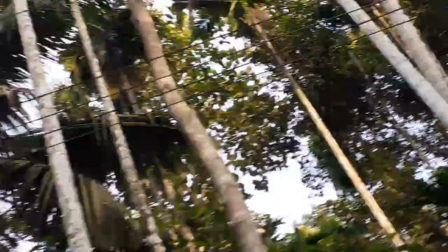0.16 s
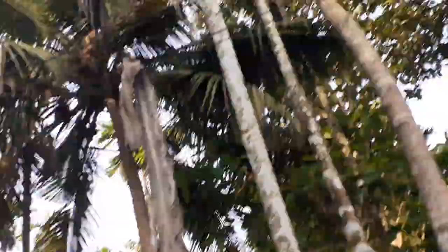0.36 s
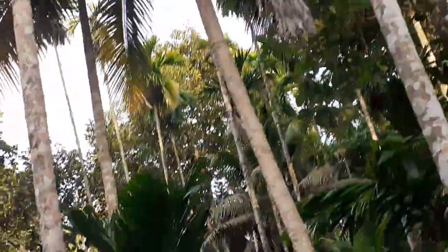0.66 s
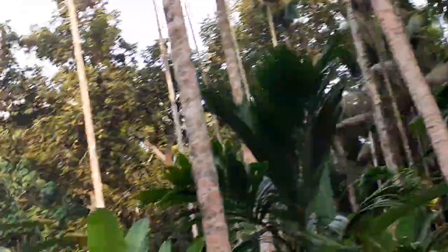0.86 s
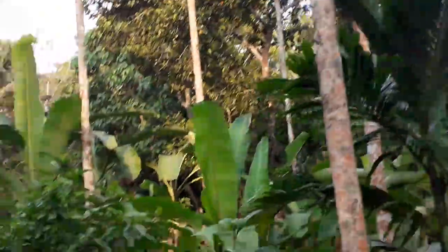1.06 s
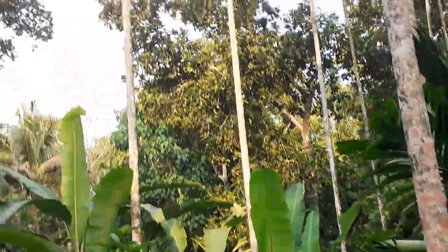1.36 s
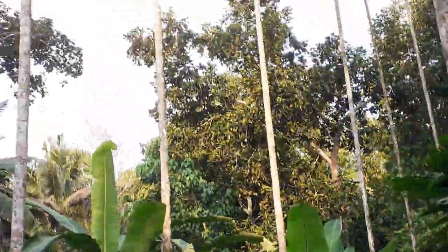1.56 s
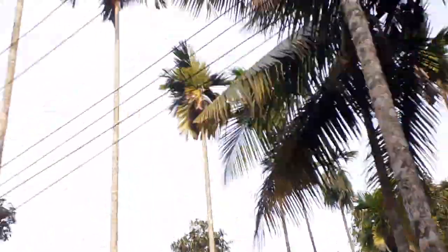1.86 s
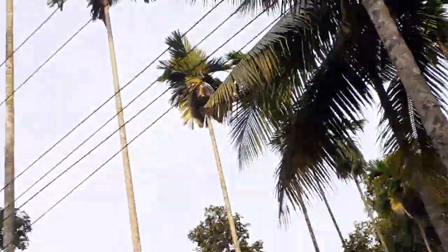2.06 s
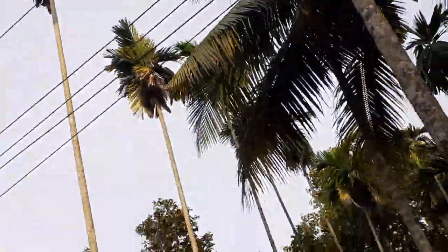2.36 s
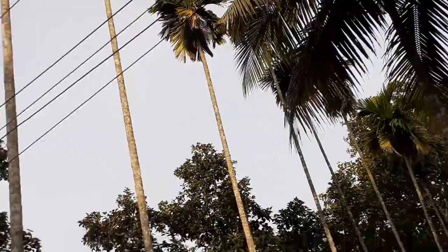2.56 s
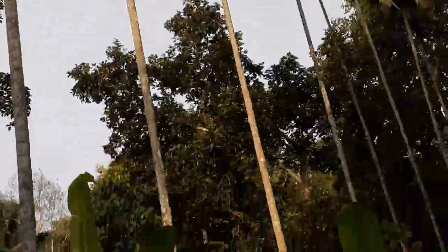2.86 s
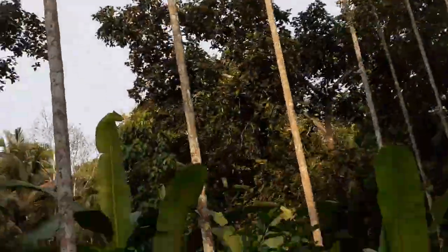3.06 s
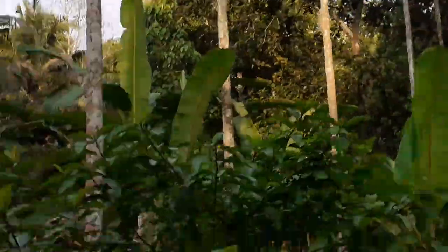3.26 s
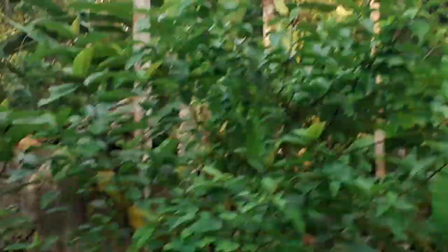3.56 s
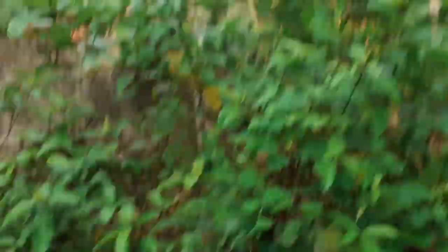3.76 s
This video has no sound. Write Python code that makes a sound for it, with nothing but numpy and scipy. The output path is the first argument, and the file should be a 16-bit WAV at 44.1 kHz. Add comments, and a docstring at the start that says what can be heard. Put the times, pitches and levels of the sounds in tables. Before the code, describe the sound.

A high, unbroken cicada chorus fills a wooded grove outdoors. Soft, slow steps crunch dry leaves and crack twigs near the carried microphone, as far-off birds give drawn-out calls and, later, quick falling chirps.

```python
"""Cicadas shrill without pause in a palm grove, each pulsing at its own rate, its body ringing near 9 kHz.
Other insects buzz further off; distant birds give drawn-out calls and falling chirps among the trees.
Close to the microphone someone walks slowly over leaf litter: crunches, snapping twigs, brushed leaves
and two dull knocks. Under it all lie still air, a soft rustle and the rumble of the carried microphone."""
import sys
import numpy as np
from scipy import signal
from scipy.fft import rfft, irfft, next_fast_len
from scipy.io import wavfile
from scipy.ndimage import map_coordinates

SR = 44100
rng = np.random.default_rng(int(sys.argv[2]) if len(sys.argv) > 2 else 0)


def int16_out(signal):
    """Quantize to a 16-bit WAV file."""
    q = np.round(np.clip(np.atleast_2d(signal).T, -1, 1) * 32767)
    wavfile.write(sys.argv[1], SR, q.astype(np.int16))


N = 171990

# loudness of the chorus in the grove: t/s, level/dB
CHORUS_LEVEL = [(0, -40), (.2, -38), (.45, -40), (.8, -39), (1.35, -41), (1.6, -40), (2.0, -41.5),
                (2.28, -41.5), (2.38, -40), (2.53, -43), (2.78, -39), (2.95, -42.5), (3.4, -41), (3.9, -42)]
# partials of one cicada: multiple of the pulse rate, relative level/dB
CICADA_PARTIALS = [(1, -16), (2, -23.5), (3, -34.5), (4, 1.5), (5, -27), (6, -26.5)]
def cicadas(singers=7, pulse_hz=2241):
    """Each cicada in the grove pulses at its own unsteady rate; its body rings at the fourth partial."""
    spread, drift, flutter = .006, .009, .016  # shares of the pulse rate
    chorus = np.zeros(N)
    for detune in np.linspace(-spread, spread, singers):
        angle = phase(pulse_hz * (1 + detune + drift * wobble(25) + flutter * wobble(700)))
        song = sum(amp(db) * np.sin(k * angle) for k, db in CICADA_PARTIALS)
        chorus += amp(1.13 * wobble(40)) * song
    return grove(unit(chorus) * level(CHORUS_LEVEL), echo=.65) * amp(.64 * wobble(21.93))


# steady drone of far insects: f/Hz, width/Hz, level/dB
DRONE_BANDS = [(2276, 56, -61), (2233, 160, -59), (4583, 284, -57), (6690, 470, -65), (8840, 402, -50.5),
               (8070, 134, -63)]
# a mid-pitched buzzer that rests and resumes: t/s, level/dB
BUZZ_LEVEL = [(0, -67.5), (.15, -61.5), (.31, -58.5), (.55, -55.5), (.85, -58.5), (1.05, -63.5), (1.3, -80),
              (1.7, -100), (3.4, -80), (3.52, -62), (3.65, -60), (3.9, -57)]
# its spectrum: f/Hz, relative level/dB
BUZZ_SPECTRUM = [(1200, -42), (1900, -16), (2600, -0.5), (3100, 4), (3600, -4), (4300, -4.5), (5500, -23),
                 (7000, -41)]
# its weak tones: f/Hz, width/Hz, level against the buzz/dB
BUZZ_TONES = [(3030, 25, -8), (3463, 12, -15.5), (1728, 20, -14.5)]
# spells of high buzzing: t/s, length/s, f/Hz, width/Hz, level/dB
HIGH_SPELLS = [(0.058, 0.39, 9950, 160, -57.5), (1.33, 0.29, 9840, 150, -59), (-0.58, 2.6, 8030, 56, -61.5)]
def far_insects():
    """Further off, many insects merge into bands of noise, some steady, some coming and going."""
    drone = sum(amp(db) * band(hz, width) for hz, width, db in DRONE_BANDS)
    buzz = coloured(BUZZ_SPECTRUM, spiky_db=1.5)
    buzz += sum(amp(db) * band(hz, width) for hz, width, db in BUZZ_TONES)
    return drone + swells(HIGH_SPELLS) + level(BUZZ_LEVEL) * buzz


# drawn-out bird calls: t/s, length/s, f/Hz, level/dB
BIRD_CALLS = [(0.035, 0.28, 1179, -53.5), (0.466, 0.47, 910, -53.5), (0.667, 0.23, 1219, -45),
              (1.5, .35, 960, -55), (1.93, .2, 1180, -44.5), (2.103, 0.21, 1223, -51),
              (2.785, 0.14, 1106, -56.5), (3.12, 0.309, 1216, -48)]
# falling chirps: t/s, starting f/Hz, level/dB
BIRD_CHIRPS = [(1.43, 2380, -44), (2.065, 2500, -41), (2.083, 2000, -47), (2.211, 2450, -39),
               (2.829, 1763, -48.5), (2.882, 2480, -34.5), (2.9, 2060, -40.5), (3.235, 2313, -45.5),
               (3.419, 1776, -44), (3.479, 2400, -37)]
def birds(chirp_s=.024):
    """Distant birds give hoarse arching calls and quick falling chirps, blurred by the trees."""
    call_rise, call_arch, chirp_fall = .04, .045, .2305  # shares of the pitch
    calls, chirps = np.zeros(N), np.zeros(N)
    for start, length, hz, db in BIRD_CALLS:
        u = progress(start, length)
        swell = arch(u)
        bend = call_rise * (u - .5) + call_arch * (swell - np.pi / 4)
        hoarseness = .048 * wobble(300)
        angle = phase(hz * (1 + bend + hoarseness))
        calls += amp(db) * swell * (np.sin(angle) + amp(-21) * np.sin(2 * angle))
    for start, hz, db in BIRD_CHIRPS:
        u = progress(start, chirp_s)
        pitch = hz * (1 - chirp_fall * u + .045 * wobble(600))
        chirps += amp(db) * arch(u) * np.sin(phase(pitch))
    return grove(calls, echo=.73) + grove(chirps, echo=.42)


# steps in leaf litter: t/s, length/s, crunch level/dB, crackle level/dB
FOOTFALLS = [(0.172, .12, -52.5, -53), (0.714, .13, -51.5, -60), (1.273, .14, -50.5, -54),
             (1.85, 0.16, -52, -62), (2.38, 0.088, -50, -48), (2.955, 0.12, -53.5, -62),
             (3.472, 0.11, -45.5, -46.5)]
# spectra of the crunch and the crackle: f/Hz, relative level/dB
CRUNCH_SPECTRUM = [(100, -36), (400, -7.5), (900, 3), (1500, 1.5), (2300, 2), (3500, -19.5), (8000, -12)]
CRACKLE_SPECTRUM = [(800, -11), (2500, 3.5), (5000, 3), (7500, 1), (11000, -6.5), (15500, -15)]
def footsteps(fade_db=6):
    """Each close step presses the litter quickly and lets it settle: a low crunch under a dry crackle."""
    crunch, crackle = np.zeros(N), np.zeros(N)
    for start, length, crunch_db, crackle_db in FOOTFALLS:
        u = progress(start, length)
        crunch += amp(crunch_db) * arch(u ** .61)
        crackle += amp(crackle_db - fade_db * u) * arch(u ** .41)
    crunch *= coloured(CRUNCH_SPECTRUM, spiky_db=4.5)
    crackle *= coloured(CRACKLE_SPECTRUM, spiky_db=4.5)
    return crunch + crackle


# twigs breaking: t/s, level/dB, f/Hz, relative edge level/dB
TWIG_SNAPS = [(.1765, -41, 605, 7), (.286, -32, 600, -20), (.773, -47, 1500, 4), (.811, -33.5, 1180, -15),
              (.948, -37, 745, -20), (1.1, -40.5, 1820, 9.5), (1.369, -47, 1530, -5),
              (1.888, -44, 1790, 12), (1.892, -33.5, 910, 6.5), (1.938, -32.5, 1100, 1),
              (1.943, -24.5, 1220, -19), (2.291, -37, 1750, -13), (2.417, -38, 1490, -4),
              (2.432, -30, 1510, -3), (2.452, -28, 1940, -2), (2.481, -33.5, 1550, 5.5),
              (3.022, -36, 1180, -19), (3.208, -39, 586, -18), (3.52, -43, 1100, -12),
              (3.538, -29, 1570, -16), (3.675, -36.5, 1630, -12)]
def twigs(cutoff_hz=7500):
    """A twig snaps underfoot: a few damped cycles with a sharp edge of noise."""
    snaps, t = np.zeros(N + SR), np.arange(SR // 20) / SR
    for start, db, hz, edge_db in TWIG_SNAPS:
        ring = np.sin(2 * np.pi * hz * t) * decay(t, .0089)
        edge = rng.standard_normal(len(t)) * decay(t, .018) / 2
        snaps[round(start * SR):][:len(t)] += amp(db) * (ring + amp(edge_db) * edge)
    return filtered(snaps[:N], lambda f: 1 / (1 + (f / cutoff_hz) ** 6))


# dull knocks: t/s, level/dB, settled f/Hz
DULL_KNOCKS = [(0.2963, -20, 359), (2.4891, -23.5, 390)]
def knocks(length_s=.0052, bend=2.87, settle_s=.00051):
    """A soft contact close by gives two or three cycles that sink quickly in pitch."""
    thuds = np.zeros(N)
    for start, db, hz in DULL_KNOCKS:
        t = np.maximum(clock() - start, 0)
        cycles = hz * (t + bend * settle_s * (1 - np.exp(-t / settle_s)))
        envelope = arch(progress(start, length_s) ** .58) ** 1.6
        thuds += amp(db) * envelope * np.sin(2 * np.pi * cycles)
    return filtered(thuds, lambda f: (1j * f / (1j * f + 70)) ** 2)  # high-pass at 70 Hz


# leaves beside the walker: t/s, length/s, f/Hz, width/Hz, level/dB
LEAF_BRUSHES = [(.2, 0.045, 1430, 250, -53.5), (1.33, 0.18, 1500, 300, -63), (3.42, .04, 5800, 450, -54)]
def brushed_leaves():
    """Leaves brushed in passing give brief swishes near the microphone."""
    return swells(LEAF_BRUSHES)


# course of the rustle and of the microphone rumble: t/s, level/dB
RUSTLE_LEVEL = [(0.0, -67), (0.48, -66.5), (0.91, -62), (1.12, -68.5), (1.57, -61.5), (1.86, -66.5),
                (2.04, -80), (2.26, -83), (2.47, -60.5), (2.8, -88), (3.01, -79), (3.15, -64.5),
                (3.27, -59), (3.39, -60.5), (3.69, -66), (3.9, -74.5)]
RUMBLE_LEVEL = [(0.0, -81), (0.26, -66), (0.3, -56), (0.37, -67.5), (0.85, -63.5), (0.91, -58),
                (1.01, -66.5), (2.39, -74.5), (2.47, -66.5), (3.12, -70.5), (3.16, -54), (3.9, -70)]
# spectra of rustle, rumble and air: f/Hz, relative level/dB
RUSTLE_SPECTRUM = [(100, -23), (250, -5), (430, 2.5), (650, -3), (1000, 0), (1400, 3), (1700, -7),
                   (2000, -7.5), (3000, -17), (6000, -50)]
RUMBLE_SPECTRUM = [(20, -40), (30, -14), (42, -9.5), (58, -3), (85, -12), (125, -10), (200, -23),
                   (500, -51)]
AIR_SPECTRUM = [(20, -28), (50, -5), (150, 2), (400, -3), (750, -5), (1150, 6), (1600, -8.5), (2000, 8),
                (3300, -15), (5600, -6.5), (7500, -6.5), (10500, -1.5), (12200, -12), (13800, -14),
                (14800, -8), (15700, -8.5)]
def background(air_db=-63):
    """Still air in the grove, a soft rustle in the low mids and the rumble of the carried microphone."""
    rustle = amp(2) * level(RUSTLE_LEVEL) * coloured(RUSTLE_SPECTRUM, spiky_db=3.5)
    rumble = level(RUMBLE_LEVEL) * amp(1.2 * wobble(11)) * coloured(RUMBLE_SPECTRUM)
    return amp(air_db) * coloured(AIR_SPECTRUM) + rustle + rumble


def grove(x, echo, reverb_s=.58):
    """Scattering among the trunks, changing as the walker moves; echo is its share of the power."""
    t, hop = np.arange(SR // 2) / SR, SR // 12
    padded = np.pad(x, (hop, 2 * hop))
    window = np.sin(np.pi * np.arange(2 * hop) / (2 * hop))
    wet = np.zeros(N + SR)
    for start in range(0, N + hop, hop):
        piece = padded[start:][:2 * hop] * window
        tail = rng.standard_normal(len(t)) * decay(t, reverb_s)
        scattered = signal.fftconvolve(piece, tail / np.linalg.norm(tail))
        wet[start:][:len(scattered)] += scattered
    return np.sqrt(1 - echo) * x + np.sqrt(echo) * wet[hop:hop + N]


def amp(db):
    """Decibels to gain."""
    return 10 ** (np.asarray(db) / 20)


def decay(t, seconds):
    """Gain that falls 60 dB in the given time."""
    return amp(-60 * t / seconds)


def unit(x):
    """Scale to rms 1."""
    return x / np.sqrt(np.mean(x ** 2) + 1e-20)


def along(points, hz):
    """Interpolate (Hz, value) points on a log axis."""
    f, values = np.transpose(points)
    return np.interp(np.log(hz + 1), np.log(f + 1), values)


def clock():
    """Time of every sample."""
    return np.arange(N) / SR


def level(rows):
    """Gain per sample from (s, dB) rows."""
    return amp(np.interp(clock(), *np.transpose(rows)))


def wobble(rate):
    """A smooth random curve, rate knots a second."""
    return map_coordinates(rng.standard_normal(8192), [clock() * rate], mode="wrap")


def filtered(x, response):
    """Pass x through a frequency response."""
    size = next_fast_len(N + SR // 2)
    return irfft(rfft(x, size) * response(np.fft.rfftfreq(size, 1 / SR)), size)[..., :N]


def coloured(spectrum, spiky_db=0):
    """Noise of rms 1 with a spectrum; spiky_db clumps it into grains."""
    grains = rng.standard_normal(N) * amp(spiky_db * wobble(500))
    return unit(filtered(grains, lambda f: amp(along(spectrum, f))))


def band(hz, width):
    """A band of noise of rms 1."""
    return unit(filtered(rng.standard_normal(N), lambda f: np.exp(-((f - hz) / (2 * width)) ** 2)))


def swells(rows):
    """Bands of noise that come and go."""
    return sum(amp(db) * np.sqrt(arch(progress(start, length))) * band(hz, width)
               for start, length, hz, width, db in rows)


def progress(start, length):
    """Runs from 0 to 1 during an event."""
    return np.clip((clock() - start) / length, 0, 1)


def arch(u):
    """Rises and falls as u runs from 0 to 1."""
    return np.abs(np.sin(np.pi * u))


def phase(hz):
    """Running phase of a moving pitch."""
    return 2 * np.pi * np.cumsum(hz) / SR


# balance at the microphone: f/Hz, left over right/dB
LEFT_BALANCE = [(7000, 0), (8150, -2.5), (8500, 9), (9000, 4.5), (9600, 6), (10400, -1.5), (12000, 2),
                (13200, 1.5), (15000, -2.5)]
# side echo, opposite in the two channels: f/Hz, relative level/dB
SIDE_ECHO = [(30, -39), (250, -23.5), (2000, -53.5), (6000, -50), (9000, -19), (14000, -20)]
def stereo_image(f, delay_s=.023):
    """Left and right responses: a narrow image, the shrill leaning left, a faint echo from the side."""
    left = 2 / (1 + amp(-along(LEFT_BALANCE, f)))
    side = amp(along(SIDE_ECHO, f)) * np.exp(-2j * np.pi * f * delay_s)
    return np.array([left + side, 2 - left - side])


def scene():
    """The grove from the walker's microphone: cicadas and birds echoing, the steps close and almost dry."""
    walker = grove(footsteps() + twigs() + brushed_leaves(), echo=.14) + knocks()
    mono = cicadas() + far_insects() + birds() + walker + background()
    return filtered(mono, stereo_image)


def record(dry, low_cut_hz=30, top_hz=15720):
    """The recorder thins the deepest bass and keeps nothing above its band limit."""
    return filtered(dry, lambda f: (f < top_hz) * f ** 6 / (f ** 6 + low_cut_hz ** 6))


dry = scene()
out = record(dry)
int16_out(out)
```